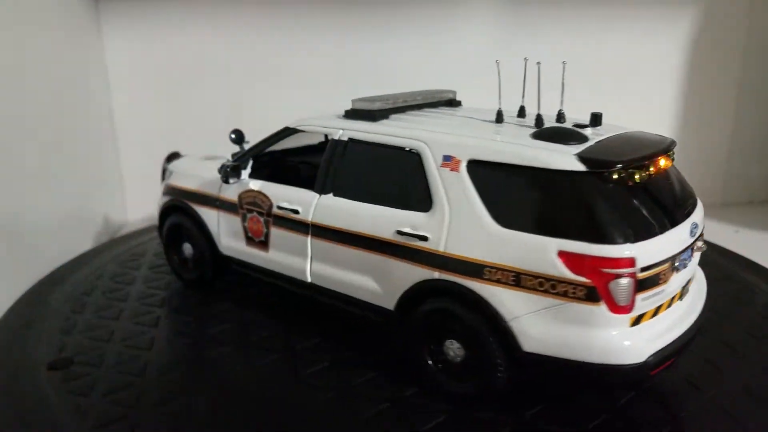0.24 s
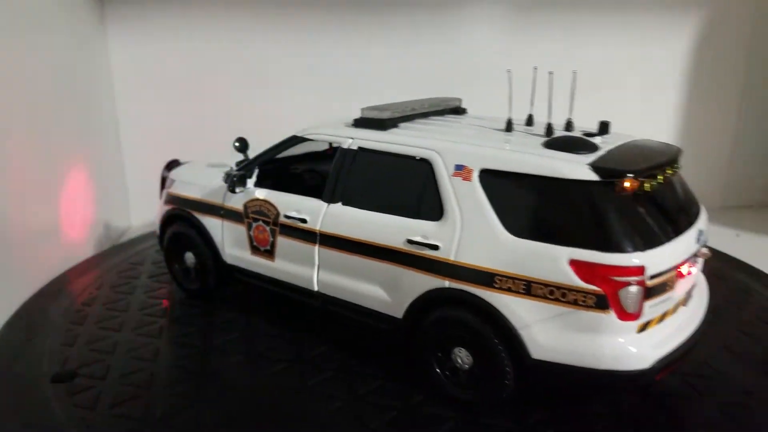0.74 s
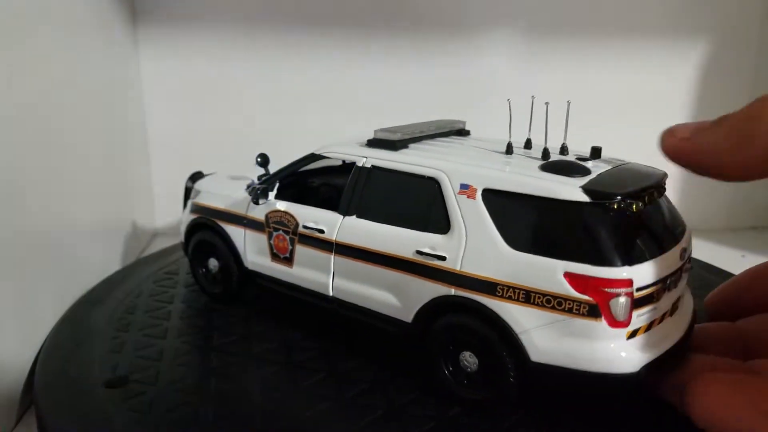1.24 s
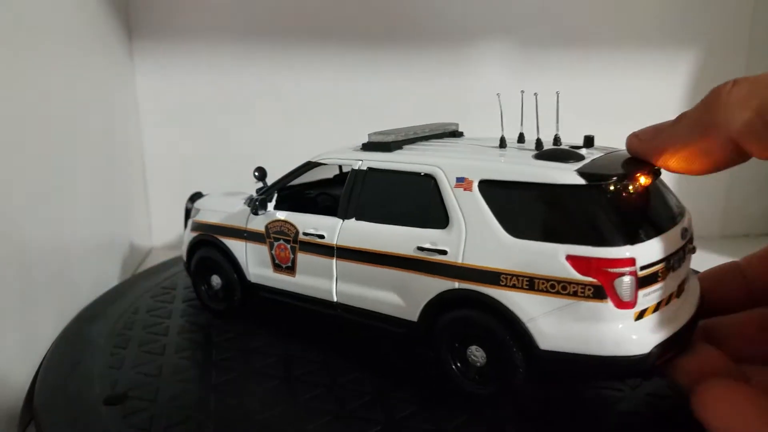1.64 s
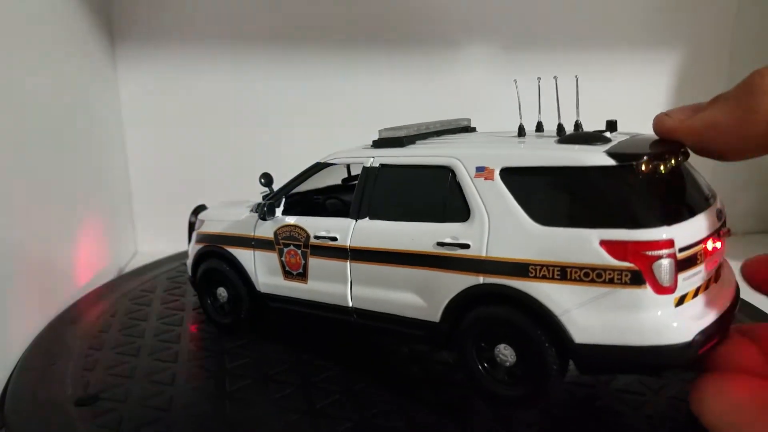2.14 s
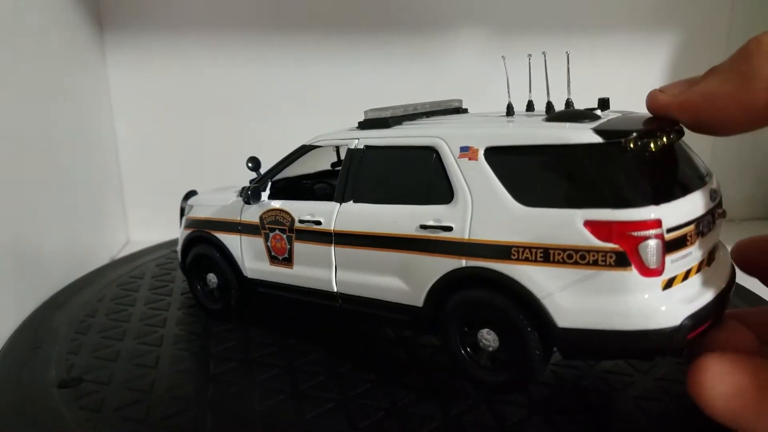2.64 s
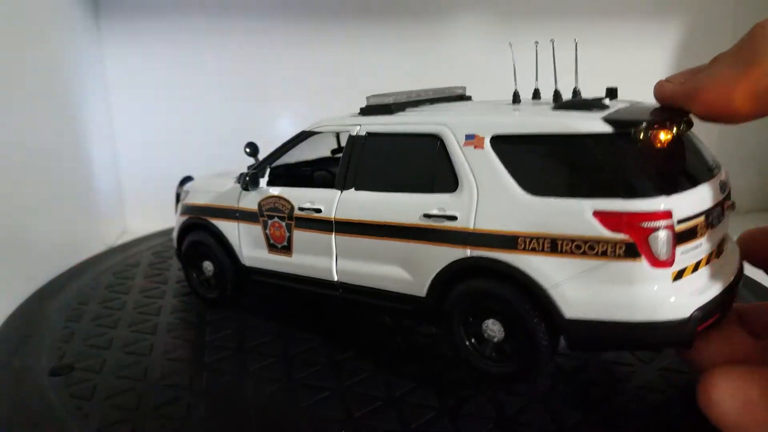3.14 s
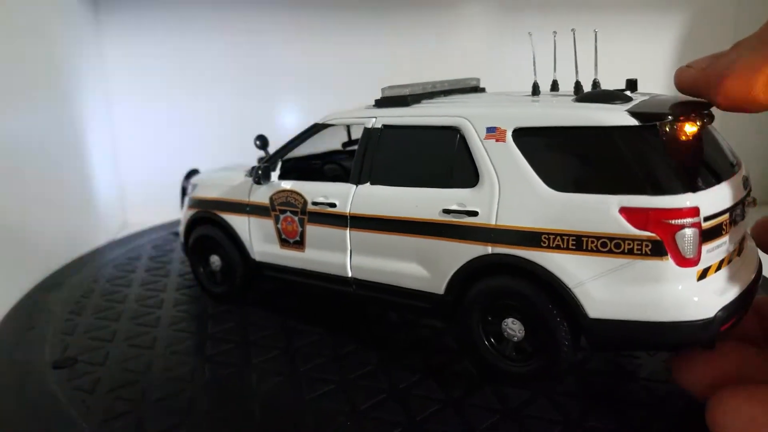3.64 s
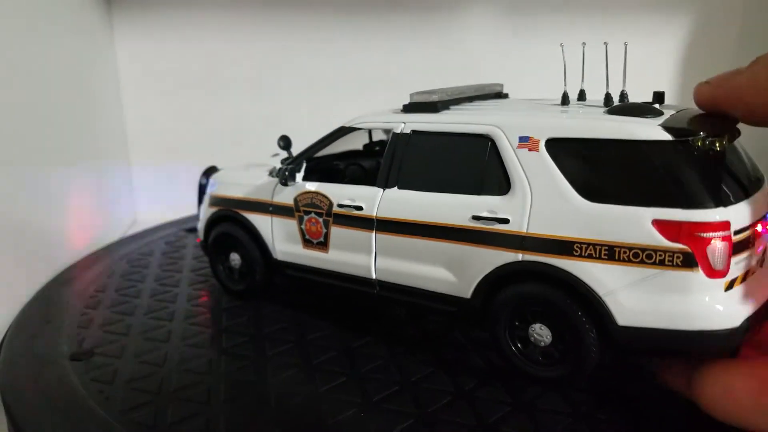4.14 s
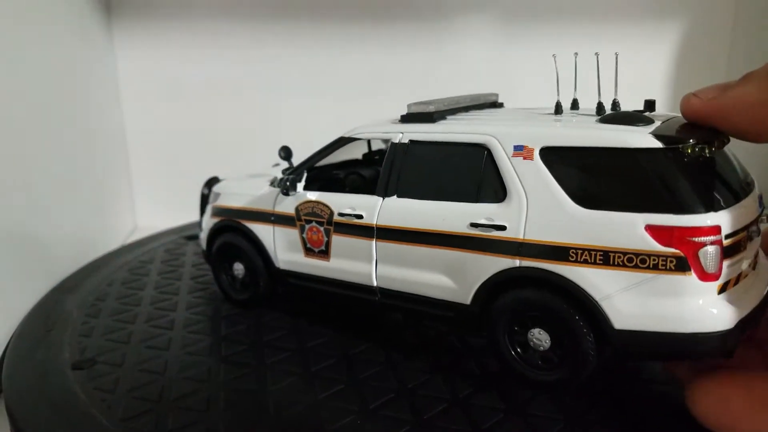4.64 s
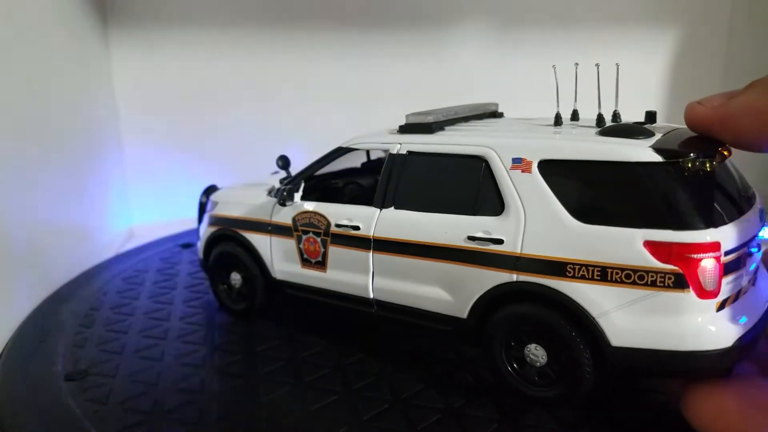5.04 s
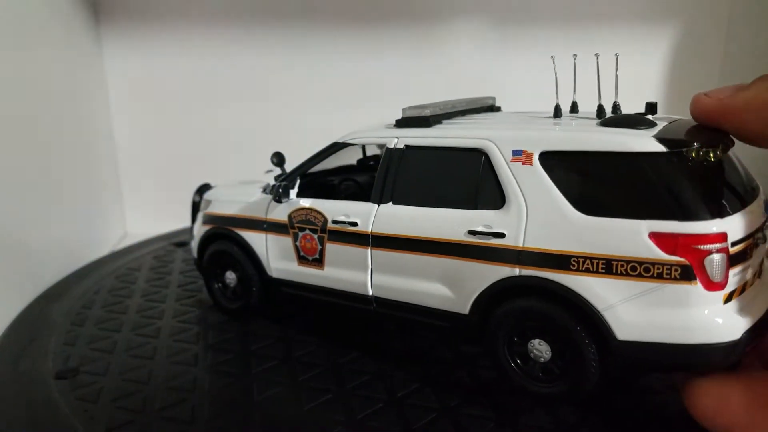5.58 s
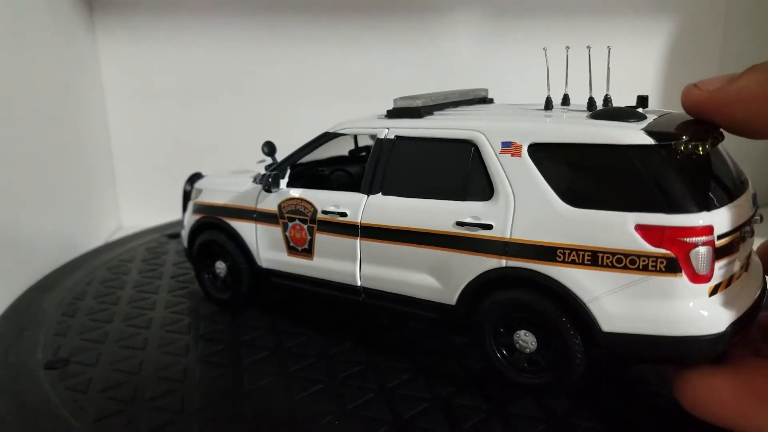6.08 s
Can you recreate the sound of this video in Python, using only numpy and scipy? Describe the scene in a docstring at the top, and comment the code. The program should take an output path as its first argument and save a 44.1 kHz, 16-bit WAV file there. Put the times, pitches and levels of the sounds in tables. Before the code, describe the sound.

A small push-button on a hollow toy car clicks in six crisp press-and-release pairs, after soft scraping, rustling and fingertip bumps in a quiet room.

```python
"""A small push-button switch snaps in press-and-release pairs under the tail of a hollow model car.
Each snap and its rebound are clicks that ring the shell's modes, with bursts of noise for the crack.
Between snaps, fingertips tap and creak on the shell: short soft bursts of noise, the taps with a tick of nail.
The plastic turntable under it thumps when jolted; early on it scrapes round and a sleeve rustles (shaped noise).
A room tail of dying noise answers the car; steady coloured noise is the quiet hum and microphone hiss."""
import sys
import numpy as np
from scipy import signal
from scipy.io import wavfile

SR = 44100
rng = np.random.default_rng(int(sys.argv[2]) if len(sys.argv) > 2 else 0)


def file_out(sig):
    """Save sig as 16-bit WAV at sys.argv[1]."""
    # one column per channel
    cols = np.atleast_2d(sig).T
    # limit, then scale
    lim = np.clip(cols, -1, 1)
    pcm = np.round(lim * 32767).astype(np.int16)
    wavfile.write(sys.argv[1], SR, pcm)


N = 278271   # length of the scene in samples
SIDES = np.array([[.5], [-.5]])   # shares a left-right difference in dB between the two channels
EDGES = 22 * 2 ** np.arange(0, 9.8, 1 / 3)   # edges of third-octave bands [Hz]
TINY = 1e-18   # inaudible offset that keeps the filters off exact silence


def from_db(db):
    """Decibels to gain."""
    return 10 ** (np.asarray(db) / 20)


def rms_one(x):
    """Scale to rms 1."""
    return x / np.sqrt(np.mean(x ** 2) + 1e-20)


def at_hz(rows, hz):
    """Read every column of a table at one frequency, on a log-frequency axis."""
    where, *columns = np.transpose(rows)
    return [np.interp(np.log(hz), np.log(where), column) for column in columns]


def low_pass(x, hz, order):
    """Keep what lies below hz."""
    return signal.sosfilt(signal.butter(order, hz, fs=SR, output="sos"), x)


def high_pass(x, hz, order=4):
    """Keep what lies above hz."""
    return signal.sosfilt(signal.butter(order, hz, "high", fs=SR, output="sos"), x)


def drift(rate_hz):
    """Slow random wandering of spread 1, made at every 40th sample and joined by straight lines."""
    r = np.exp(-80 * np.pi * rate_hz / SR)
    white = rng.standard_normal(N // 40 + 2002)
    slow = signal.lfilter([1], [1, -2 * r, r * r], white)[2000:]   # drop the filter's start-up
    return np.interp(np.arange(N) / 40, np.arange(len(slow)), rms_one(slow))


def ring(force, hz, t60):
    """A resonance: a unit click sets a sine of starting height 1 ringing, 60 dB down after t60 seconds."""
    r = from_db(-60 / (t60 * SR))
    w = 2 * np.pi * hz / SR
    return signal.lfilter([0, np.sin(w)], [1, -2 * r * np.cos(w), r * r], force + TINY)


def bands(*shape):
    """Band by band, give the centre [Hz] and a pair of unrelated noises."""
    white = rng.standard_normal((2, 2, *shape))
    for k, (low, high) in enumerate(zip(EDGES, EDGES[1:])):
        band = signal.butter(2, [low, high], "band", fs=SR, output="sos")
        yield np.sqrt(low * high), signal.sosfilt(band, white[k % 2])


def dying_noise(rows, size, count=1):
    """Stereo bursts of noise: each band holds the energy of its row and dies at its own rate."""
    t, out = np.arange(size) / SR, 0
    for hz, pair in bands(count, size):
        level_db, t60, *pan_db = at_hz(rows, hz)
        dying = pair * from_db(-60 * t / t60)
        energy = np.sum(dying ** 2, axis=2, keepdims=True) / (hz / 1000)   # wider bands hold more
        gain = from_db(level_db + SIDES[..., None] * sum(pan_db))
        out = out + dying / np.sqrt(energy) * gain * (hz > 200)
    return out


# how alike the steady noises are left and right: (frequency [Hz], likeness [0 to 1])
LIKENESS = [(60, 1), (250, 0.79), (1000, 0.077), (4000, 0.06), (12000, 0.055)]
# how far the steady noises lean to the left: (frequency [Hz], left-right difference [dB])
NOISE_PAN = [(60, -3.5), (240, -1.5), (950, -2.5), (3770, 0), (15000, -2)]


def steady(spectrum, patchy_db, size):
    """Stereo noise of a given colour, each band wavering on its own; rms 1 over its length."""
    out = np.zeros((2, N))
    for hz, (mid, side) in bands(size):
        alike = np.clip(at_hz(LIKENESS, hz)[0], 0, 1)
        waver_db = patchy_db * drift(14.0)[:size]
        level_db = at_hz(spectrum, hz)[0] + waver_db + SIDES * at_hz(NOISE_PAN, hz)[0]
        stereo = np.sqrt(1 + alike) * mid + np.sqrt(1 - alike) * side * [[1], [-1]]
        out[:, :size] += from_db(level_db) * stereo
    return out / np.sqrt(np.mean(out[:, :size] ** 2))


AIR_DB = -60   # rms level
# colour of the hum and hiss: (frequency [Hz], relative level [dB per Hz])
AIR = [(13, -51), (22, -27), (32, -17), (56, -11.5), (140, -6.5), (347, -19), (432, -17.5), (585, -22),
       (861, -26), (935, -18), (1130, -41), (1270, -26), (4380, -34.5), (7810, -46), (16000, -36.5)]


def air():
    """Quiet room hum and microphone hiss, as one noise whose bands waver slightly around a set colour."""
    return from_db(AIR_DB) * steady(AIR, patchy_db=2.0, size=N)


STILL_S = 2.1   # no scraping or rustling from here on


def strokes(rows, rise, fall):
    """Level in dB over time: each movement swells, holds and fades; rise and fall in dB per second."""
    t = np.arange(N) / SR
    levels = [db - rise * np.maximum(s - t, 0) - fall * np.maximum(t - s - length, 0)
              for s, length, db in rows]
    return np.max(levels, axis=0)


# colour of the scraping: (frequency [Hz], relative level [dB per Hz])
SCRAPE_COLOUR = [(65, -44), (110, 2), (240, -8), (281, -3), (346, -7.5), (442, -16.5), (583, -8.5),
                 (719, -13), (2650, -24), (7000, -49), (9100, -84), (15400, -120)]
# scraping movements, each held at its level: (start time [s], length [s], level [dB])
SCRAPES = [(.06, .33, -53.5), (.87, 0.22, -63), (1.3, 0.21, -60.5), (1.53, 0.019, -51.5), (1.8, 0.1, -70.5)]


def scrape():
    """The turntable scrapes round: uneven low noise that comes and goes with each movement."""
    level_db = strokes(SCRAPES, rise=238, fall=396) + 2.5 * drift(28.0)
    return from_db(level_db) * steady(SCRAPE_COLOUR, patchy_db=3.5, size=round(STILL_S * SR))


# colour of the rustling: (frequency [Hz], relative level [dB per Hz])
RUSTLE_COLOUR = [(880, -19), (1500, 3), (1760, -25), (2370, 4), (3350, -20), (4330, -7), (16000, -14)]
# sleeve movements, each held at its level: (start time [s], length [s], level [dB])
RUSTLES = [(.06, .34, -75.5), (.86, 0.17, -66), (1.47, 0.045, -75.5)]


def rustle():
    """A sleeve rustles: brighter uneven noise that starts fast and fades more slowly."""
    level_db = strokes(RUSTLES, rise=598, fall=124) + 1.5 * drift(24.0)
    return from_db(level_db) * steady(RUSTLE_COLOUR, patchy_db=3.0, size=round(STILL_S * SR))


ROOM_DB, ROOM_RISE_S = -1, 0.0013   # level of the tail, build-up time
# colour and fading of the room tail: (frequency [Hz], relative level [dB per Hz], t60 [s])
ROOM = [(301.4, -5.5, 0.59), (800, -7, 0.38), (1320, -6, 0.28), (1470, -1.5, 0.31), (2000, -2, 0.27),
        (3020, -2.5, 0.21), (5170, -6.5, 0.29), (7950, -15.5, 0.33), (11900, -8, 0.18),
        (15600, -15.5, 0.033)]


def room(x):
    """Reflections build up over a few milliseconds and die band by band."""
    tail = dying_noise(ROOM, size=20000)[:, 0]
    tail = tail * (1 - np.exp(-np.arange(20000) / SR / ROOM_RISE_S)) ** 2
    tail = tail / np.sqrt(np.sum(tail ** 2) / 2)
    return from_db(ROOM_DB) * signal.fftconvolve(x, tail, axes=1)[:, :N]


# low modes of the plastic disc: (frequency [Hz], level [dB], t60 [s])
DISC_MODES = [(206.4, -8, 0.21), (259, -2, 0.041), (328, -8.5, 0.072)]
# jolts to the turntable: (time [s], push level before softening [dB])
THUMPS = [(0.064, -43.5), (0.144, -42), (0.274, -45), (0.361, -50), (0.969, -31), (1.001, -32),
          (1.025, -41.5), (1.099, -53), (1.303, -45), (1.533, -54), (1.686, -50), (2.177, -47),
          (4.399, -53), (4.654, -49), (4.867, -44.5), (5.471, -46), (5.588, -50.5), (6.196, -53),
          (6.208, -37.5), (6.23, -42), (6.296, -48)]


def turntable():
    """Soft jolts ring the low modes of the plastic disc."""
    push = np.zeros(N)
    for s, push_db in THUMPS:
        push[round(s * SR)] = from_db(push_db)
    push = low_pass(push + TINY, 250, order=2)
    modes = sum(from_db(level_db) * ring(push, hz, t60) for hz, level_db, t60 in DISC_MODES)
    return high_pass(modes, 140)


SHELL_LOW_HZ = 660   # a small shell radiates no bass
MOST_CYCLES = 65   # painted metal and plastic damp every mode within this many cycles
SWITCH_PANEL_HZ = 1400   # modes near here belong to the panel that carries the switch
# modes of the car shell: (frequency [Hz], level [dB], longest t60 [s], left-right difference [dB])
SHELL_MODES = [(715, -19.5, 0.071, -2.5), (797, -16.5, 0.068, 2.2), (988, -22.5, .05, 6.5),
               (1070, -25, 0.066, 6.3), (1365, -11, 0.05, 11), (1412, -4, 0.05, -3),
               (1703, -4.5, .04, -3.5), (1825, -4.5, 0.05, -1.5), (2075, 4, 0.014, -6.5),
               (2237, -2, 0.03, -9), (2737, -1.5, 0.026, 4.5), (2536, 2.5, 0.014, -4),
               (3065, -0.5, .018, -14), (3727, -8.5, .025, -10), (3750, -22.5, 0.025, -3),
               (4280, -17.5, 0.035, -6.5), (5160, -16, 0.012, 2), (5560, -5.5, 0.0093, -1.3),
               (5400, -20, .011, 0.5), (6240, -13, 0.012, 0.5)]


def shell(force, panel_db=0):
    """The shell's modes, of alternating sign, reach the two microphones at levels of their own."""
    modes = 0
    for k, (hz, level_db, t60, pan_db) in enumerate(SHELL_MODES):
        on_panel = abs(hz - SWITCH_PANEL_HZ) < 120
        gain = from_db(level_db + panel_db * on_panel + SIDES * pan_db) * (-1) ** k
        modes = modes + gain * ring(force, hz, min(t60, MOST_CYCLES / hz))
    return high_pass(modes, SHELL_LOW_HZ)


FINGER_REACH_DB = -5   # the fingers drive the switch's panel somewhat less than the switch does
CREAK_CUT_HZ, CREAK_MS = 985, 2.8   # contact cut-off and length of every creak
NAIL_LOW_HZ = 1900
NAIL_TOP_HZ_AT_1_MS = 43800   # the shorter the contact, the higher the tick reaches
HAND_PAN_DB, HAND_PAN_SPREAD_DB = 0.3, 3   # left-right difference: average, chance spread
# fingertip taps with a tick of nail:
# (time [s], push level [dB], contact cut-off [Hz], contact length [ms], nail tick level [dB])
TAPS = [(0.145, -49, 4600, 1.9, -70), (0.273, -50, 1700, 3.1, -70), (0.362, -50, 1290, 7.8, -55),
        (0.97, -32, 1230, 11.4, -36.5), (1.292, -46.5, 1860, 2.9, -52), (1.304, -22.5, 1290, 7, -31.5),
        (1.311, -23, 1510, 4.6, -42), (1.533, -42, 1290, 10, -48.5), (1.685, -34, 930, 2.6, -46.5),
        (1.914, -52, 1470, 3.4, -80), (1.982, -30.5, 1020, 4.3, -38), (2.086, -29.5, 1040, 4.7, -40.5),
        (2.178, -42.5, 1120, 1.6, -71), (2.678, -34, 1050, 4.3, -45), (4.4, -46.5, 1500, 2.3, -80),
        (5.493, -38.5, 1220, 1.3, -74), (6.11, -58.5, 6520, 2.2, -70), (6.196, -32.5, 1850, 4.1, -47.5)]
# the shell creaks under the finger pad, mostly as it loads or unloads the switch:
# (time [s], push level [dB])
CREAKS = [(0.063, -51.5), (0.464, -51.5), (1.099, -54.5), (1.954, -51), (2.035, -44.5), (2.2, -38.5),
          (2.12, -54), (2.352, -48), (2.39, -45), (2.668, -45), (2.91, -43.5), (3.211, -35.5), (3.225, -44),
          (3.34, -44), (3.362, -44.5), (3.79, -50), (3.804, -41.5), (3.814, -41), (3.97, -45),
          (4.121, -48.5), (4.627, -51.5), (4.654, -42.5), (4.68, -39.5), (4.694, -42), (4.719, -33.5),
          (4.835, -43.5), (4.867, -36.5), (4.876, -40.5), (5.452, -40.5), (5.462, -42), (5.473, -39.5),
          (5.588, -44.5), (6.177, -42.5), (6.208, -43), (6.264, -44.5), (6.272, -44), (6.296, -51)]


def fingers():
    """Skin is soft: each contact is a dull, uneven push on the shell; taps add a tick of nail, creaks none.

    Returns the direct sound and the scuff that the walls get.
    """
    creaks = [(s, push_db, CREAK_CUT_HZ, CREAK_MS, -np.inf) for s, push_db in CREAKS]
    contacts = TAPS + creaks
    force, nail = np.zeros((2, 2, N))
    grit = rng.standard_normal((len(contacts), 2, 1800))   # one noise for the skin, one for the nail
    t_ms = np.arange(1800) / SR * 1000
    pans_db = HAND_PAN_DB + HAND_PAN_SPREAD_DB * rng.standard_normal(len(contacts))
    for (s, push_db, soft_hz, contact_ms, tick_db), grains, pan_db in zip(contacts, grit, pans_db):
        age = t_ms / max(contact_ms, .2)
        skin, tick = grains * (1 - np.exp(-12.0 * age)) * np.exp(-age)   # quick rise, slower fade
        skin = low_pass(skin, soft_hz, order=4)
        skin = skin / np.sqrt(np.sum(skin ** 2))
        tick = low_pass(tick, min(NAIL_TOP_HZ_AT_1_MS / contact_ms, .45 * SR), order=2)
        at, pan = round(s * SR), from_db(SIDES * pan_db)
        force[:, at:at + 1800] += (from_db(push_db) * pan * skin)[:, :N - at]
        nail[:, at:at + 1800] += (from_db(tick_db) * pan * tick)[:, :N - at]
    scuff = from_db(13.0) * high_pass(force + TINY, SHELL_LOW_HZ) + high_pass(nail + TINY, NAIL_LOW_HZ)
    return from_db(-7.5) * shell(force, FINGER_REACH_DB) + scuff, scuff


PRESS_BRIGHT_DB, PRESS_REBOUND_DB = -0.77, -11.5   # strength of the crack and of the rebound
RELEASE_BRIGHT_DB, RELEASE_REBOUND_DB = 0.9, -2.5
REBOUND_S = 0.0021   # delay of the rebound
TOP_HZ = 7760   # a sharper snap reaches further above this
CRACK_DB = 5
SCATTER_DB, SCATTER_LOW_HZ = 3.5, 650   # the snap as the walls hear it, averaged over all directions
SHELL_TO_WALLS_DB = -34   # the ringing shell is heard in the room too
# dense upper modes of the switch:
# (frequency [Hz], relative level [dB per Hz], t60 [s], left-right difference [dB])
CRACK = [(1460, -29.5, 0.075, -9), (2800, -13, 0.021, -9), (4550, -8, 0.029, -5), (7320, -11.5, 0.022, 5.5),
         (9700, -17, 0.032, -21), (12800, -21, 0.021, -2.5), (15170, -14.5, 0.017, -7),
         (16500, -15.5, .012, -9)]
# switch snaps, press and release in turn: (time [s], click level [dB], top treble level [dB])
SNAPS = [(2.215, -15, 6), (2.411, -16, -15.5), (2.749, -14, 6), (2.937, -15, -1.5), (3.239, -13, 5),
         (3.383, -15, -3.5), (3.863, -13, 2), (4.042, -14.5, -6), (4.742, -12, 2), (4.885, -13, -5.5),
         (5.512, -14, 5), (5.625, -13.5, -9)]


def switch():
    """The sprung dome snaps through, rebounds once and rattles.

    Returns the direct sound and what the walls get.
    """
    force, snap, sharp = np.zeros((3, N))
    crack = np.zeros((2, N))
    # sparse random clicks that die away
    rattle = rng.standard_normal((len(SNAPS), 200)) * (rng.random((len(SNAPS), 200)) < .1)
    rattle *= from_db(-17 - 60 * np.arange(200) / SR / 0.015)
    # a fresh burst of noise for each snap and each rebound
    cracks = dying_noise(CRACK, size=1500, count=2 * len(SNAPS))
    late = int(np.clip(REBOUND_S * SR, 1, 199))
    for k, (s, peak_db, top_db) in enumerate(SNAPS):
        bright_db, rebound_db = PRESS_BRIGHT_DB, PRESS_REBOUND_DB
        if k % 2:
            bright_db, rebound_db = RELEASE_BRIGHT_DB, RELEASE_REBOUND_DB
        at = round(s * SR)
        force[at:at + 200] += from_db(peak_db) * rattle[k]
        force[[at, at + late]] += from_db([peak_db, peak_db + rebound_db])
        pair = cracks[:, 2 * k:2 * k + 2]
        top_gain = from_db(top_db) - 1   # how much treble to add or take away
        pair = pair + top_gain * high_pass(pair, TOP_HZ, order=1)
        first, second = np.swapaxes(from_db(peak_db + bright_db) * pair, 0, 1)
        crack[:, at:at + 1500] += first
        crack[:, at + late:at + late + 1500] += from_db(rebound_db) * second
        # for the walls, one click holds the energy of snap and rebound
        snap[at] = from_db(peak_db + SCATTER_DB) * np.sqrt(1 + from_db(2 * rebound_db))
        sharp[at] = snap[at] * top_gain
    snap += high_pass(sharp + TINY, TOP_HZ, order=1)
    body = shell(force)
    direct = from_db(-10.5) * body - from_db(CRACK_DB) * crack
    to_walls = high_pass(snap + TINY, SCATTER_LOW_HZ) + from_db(SHELL_TO_WALLS_DB) * body
    return direct, to_walls


RIGHT_LAG_S = 7e-5   # the left microphone is a little nearer
NOISE_TOP_HZ, CUTOFF_HZ = 15850, 17150   # upper limit of room and noises, then of everything


def scene():
    """The car, its room, the movements around it and the air."""
    t = np.arange(N) / SR
    clicks, snaps = switch()
    taps, scuffs = fingers()
    car = clicks + taps + turntable()
    car[1] = np.interp(t - RIGHT_LAG_S, t, car[1])
    around = room(snaps + from_db(-8.5) * scuffs) + scrape() + rustle() + air()
    noise_edge = signal.ellip(8, .5, 60, NOISE_TOP_HZ, fs=SR, output="sos")
    return car + signal.sosfilt(noise_edge, around)


def record(dry):
    """The top is cut steeply."""
    return signal.sosfilt(signal.cheby2(14, 70, CUTOFF_HZ, fs=SR, output="sos"), dry)


dry = scene()
out = record(dry)
file_out(out)
```